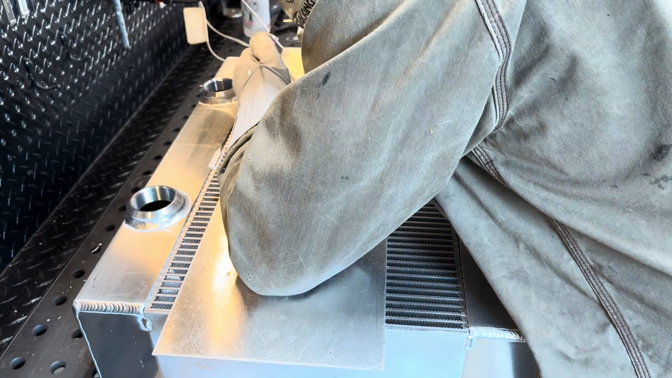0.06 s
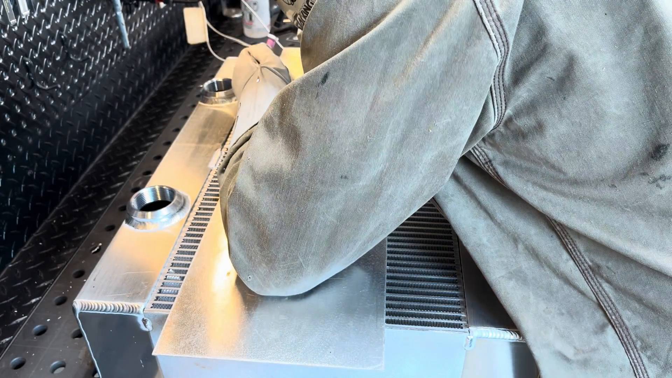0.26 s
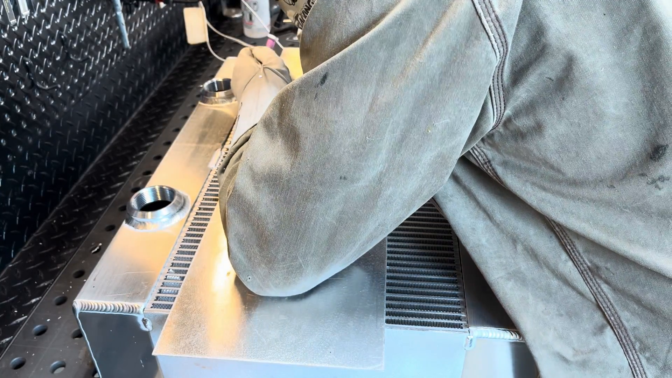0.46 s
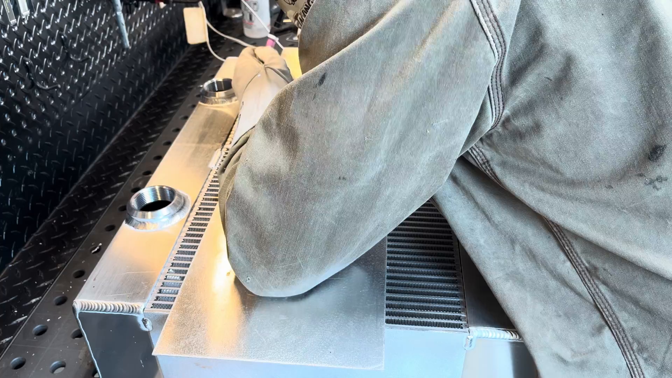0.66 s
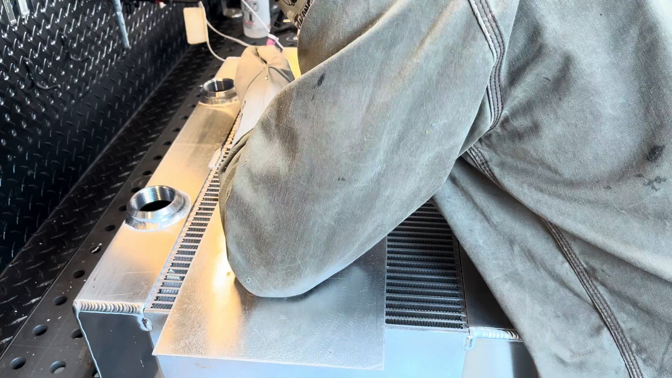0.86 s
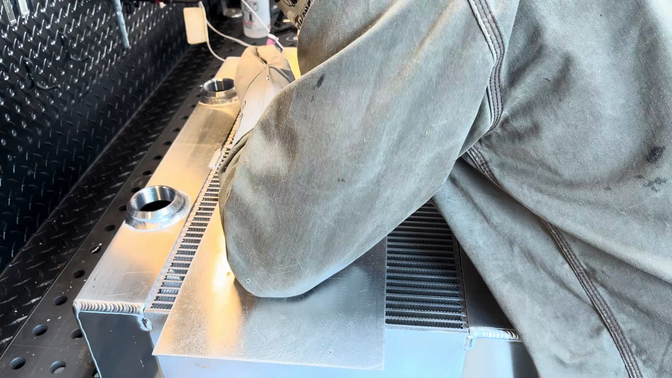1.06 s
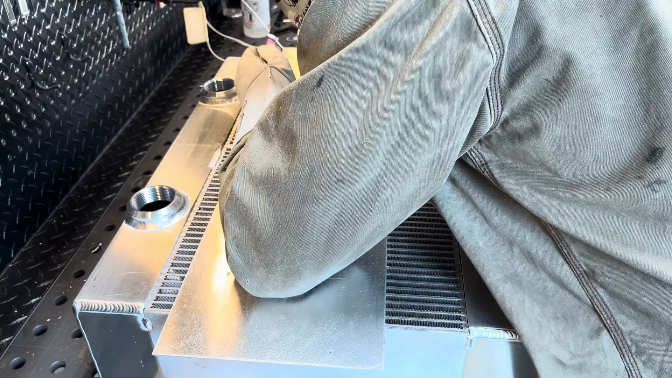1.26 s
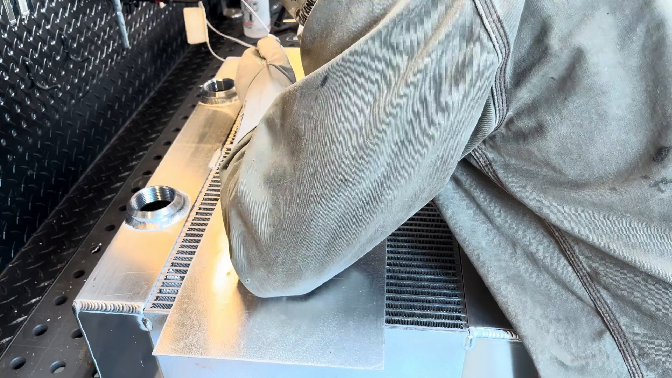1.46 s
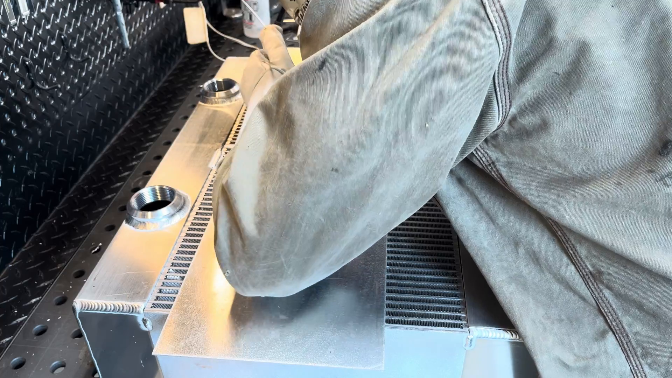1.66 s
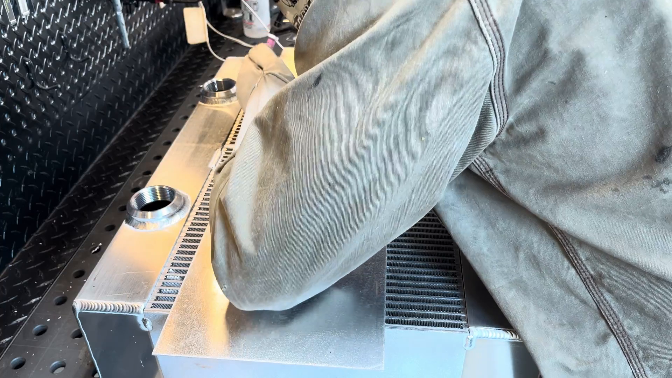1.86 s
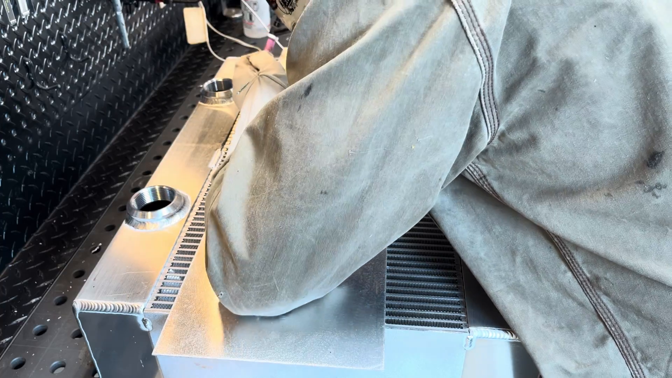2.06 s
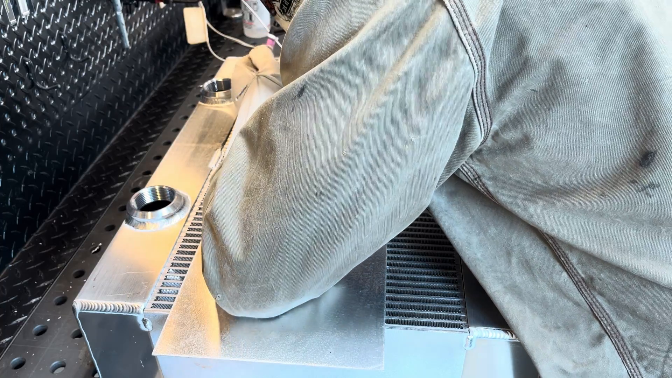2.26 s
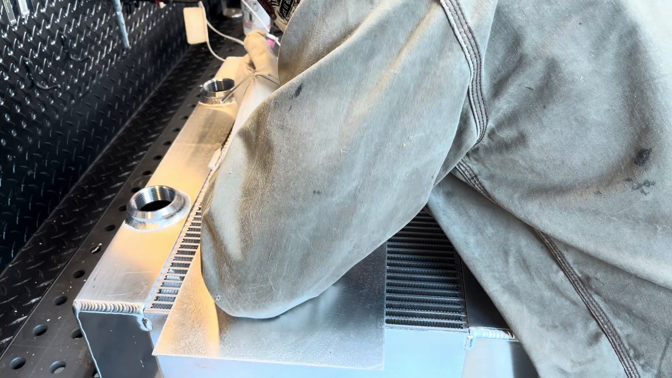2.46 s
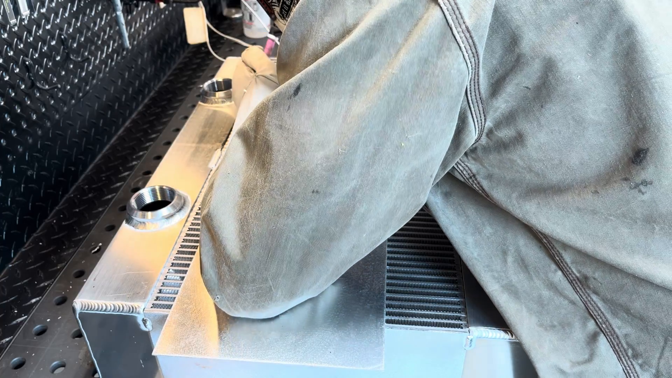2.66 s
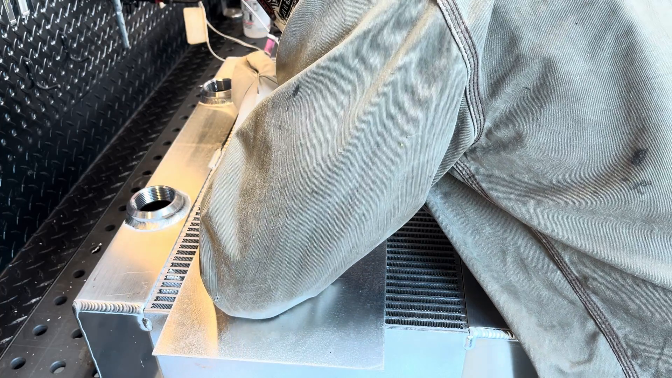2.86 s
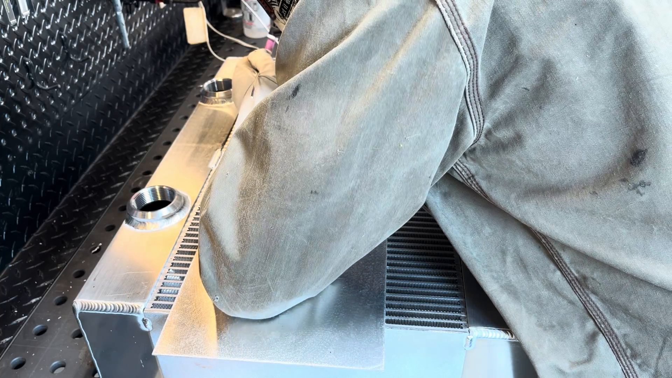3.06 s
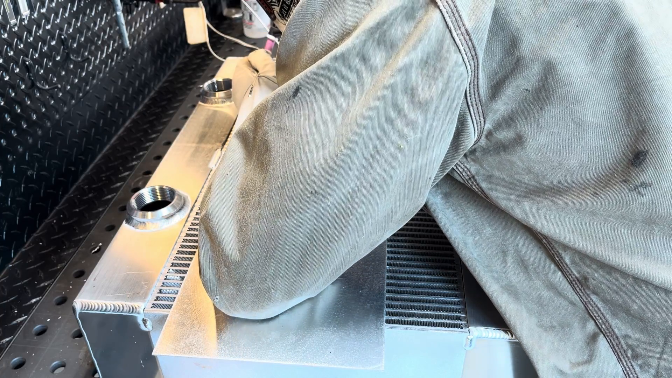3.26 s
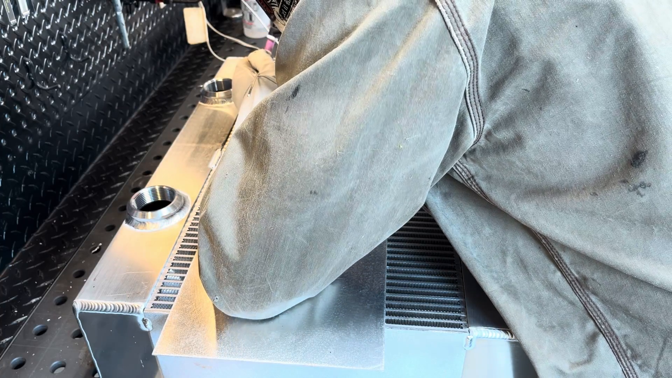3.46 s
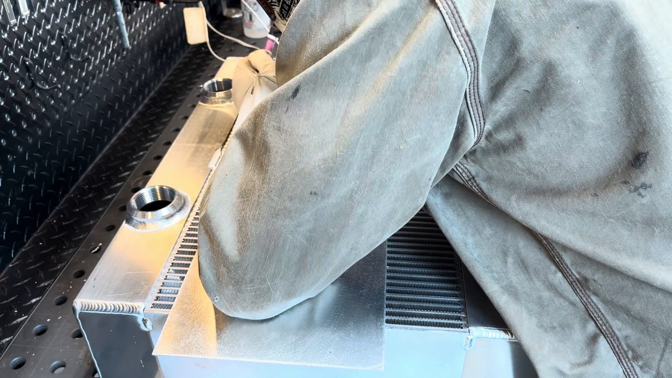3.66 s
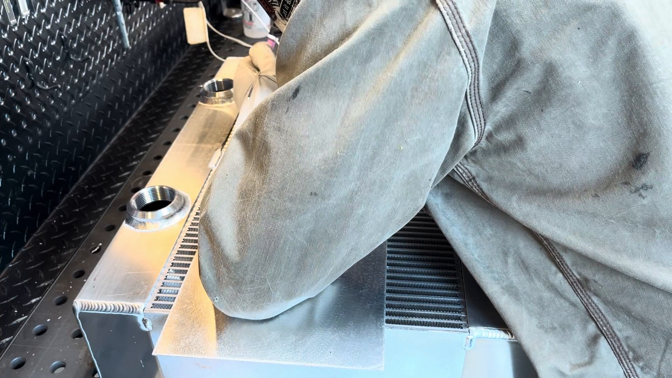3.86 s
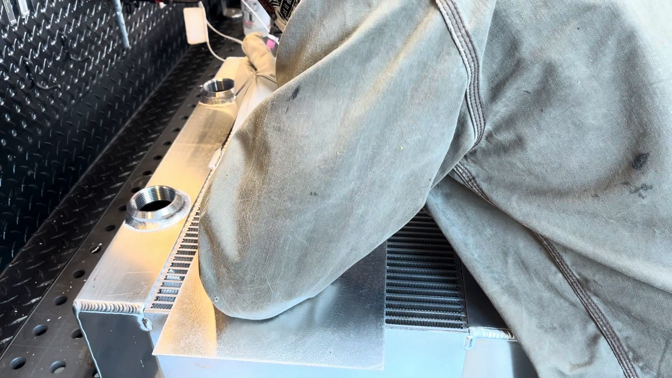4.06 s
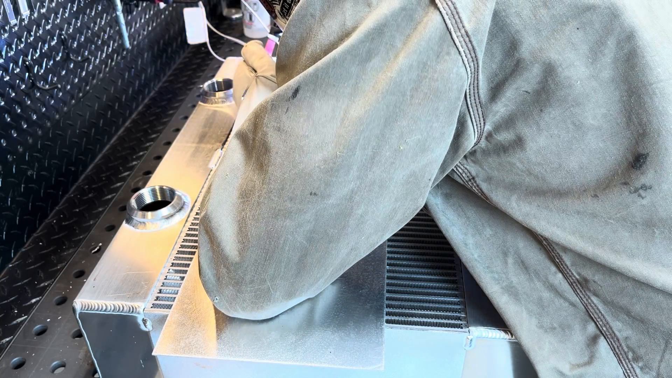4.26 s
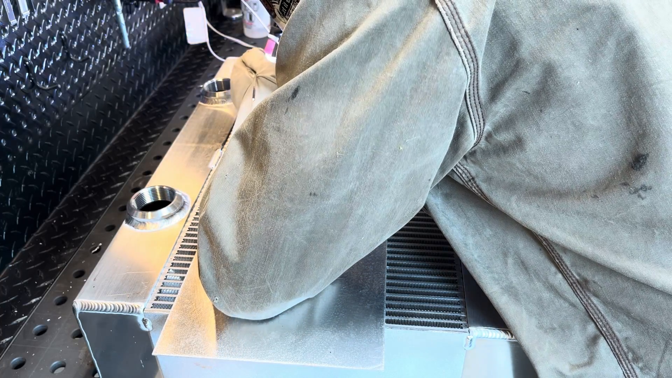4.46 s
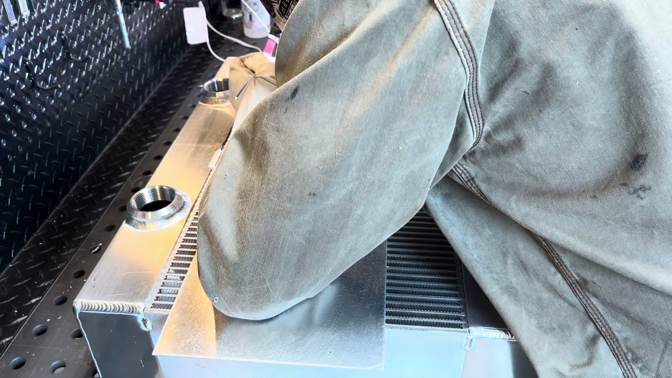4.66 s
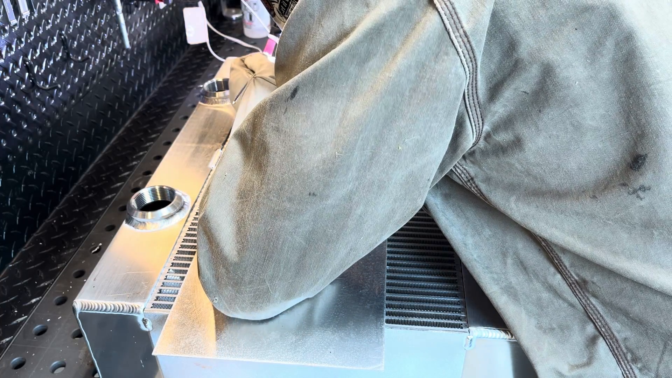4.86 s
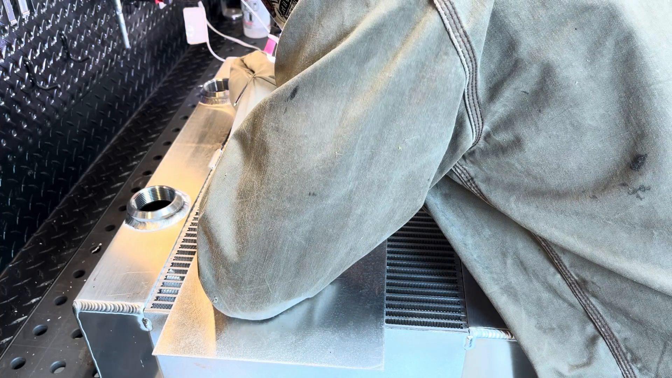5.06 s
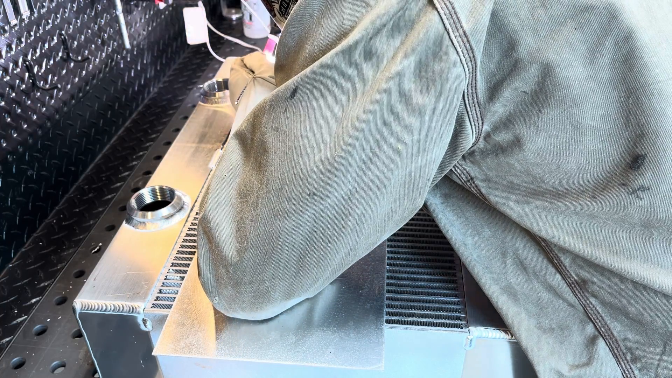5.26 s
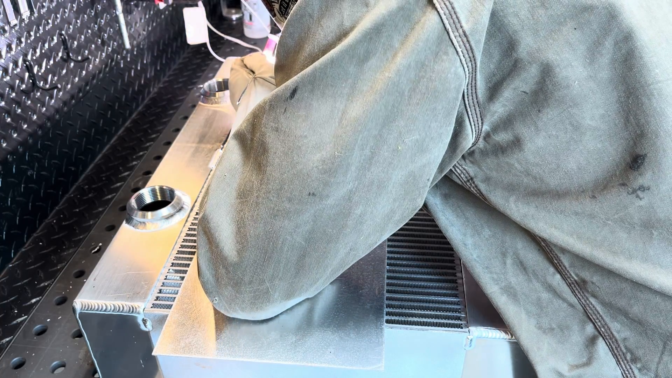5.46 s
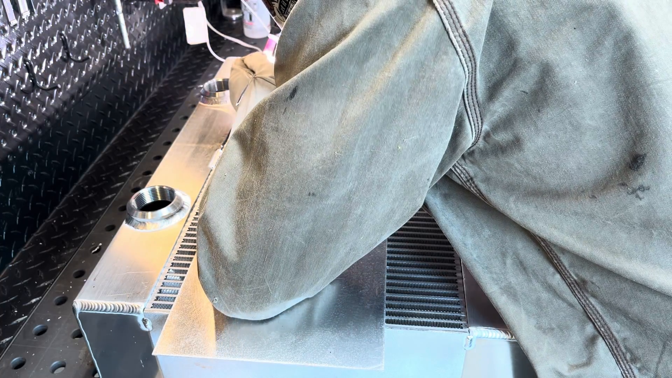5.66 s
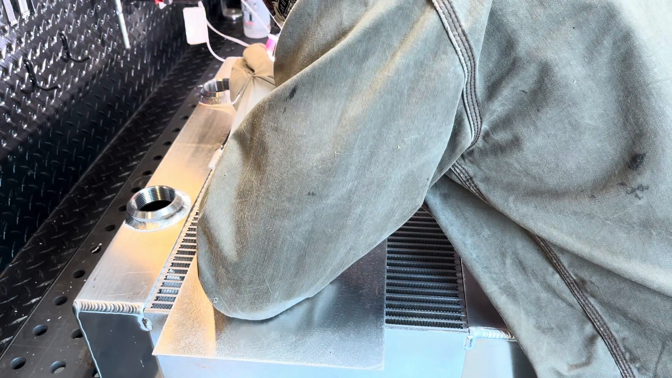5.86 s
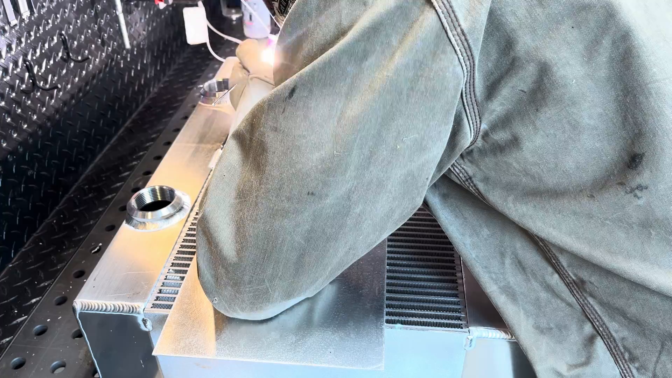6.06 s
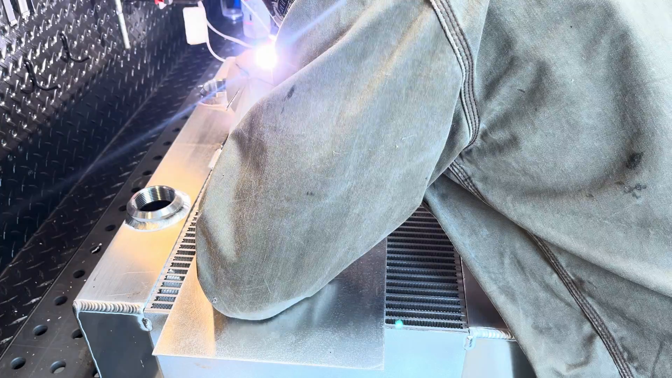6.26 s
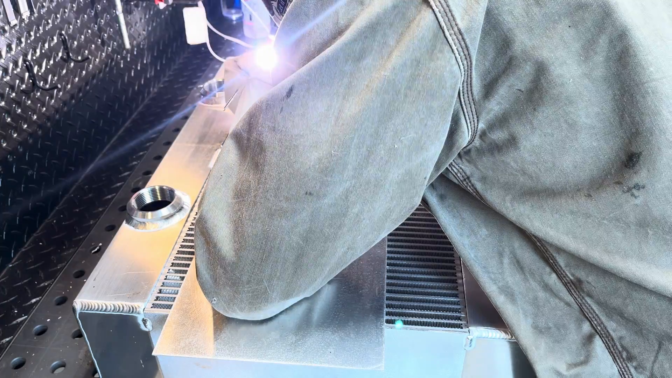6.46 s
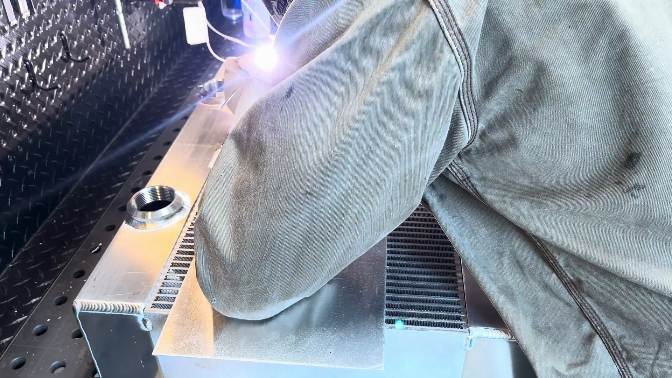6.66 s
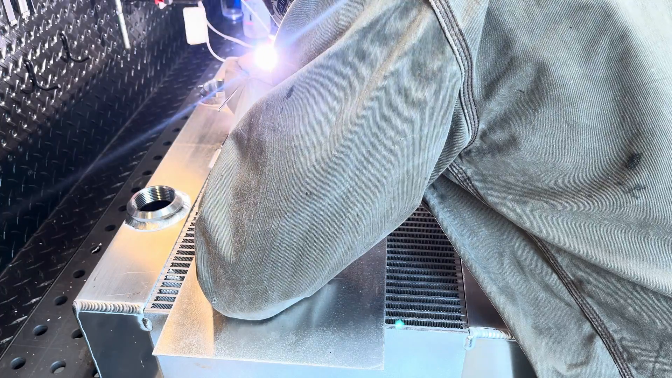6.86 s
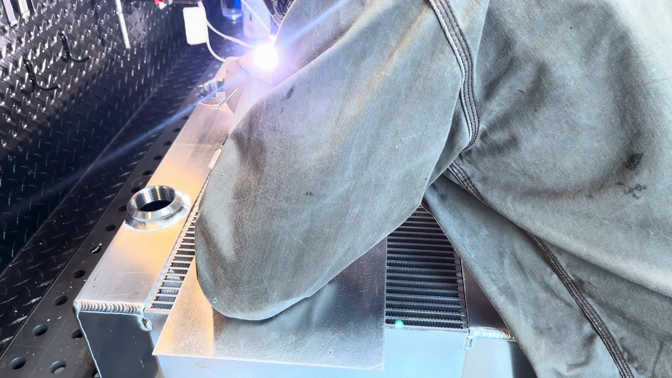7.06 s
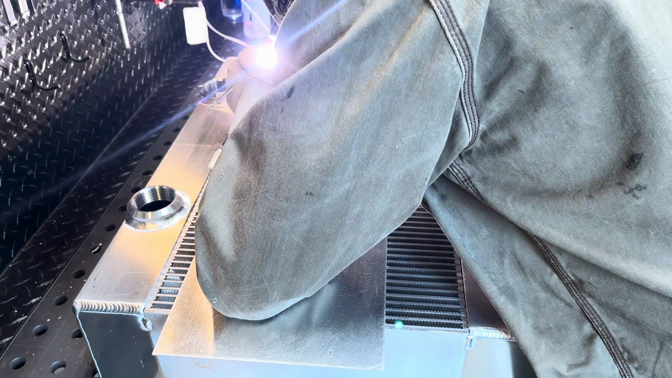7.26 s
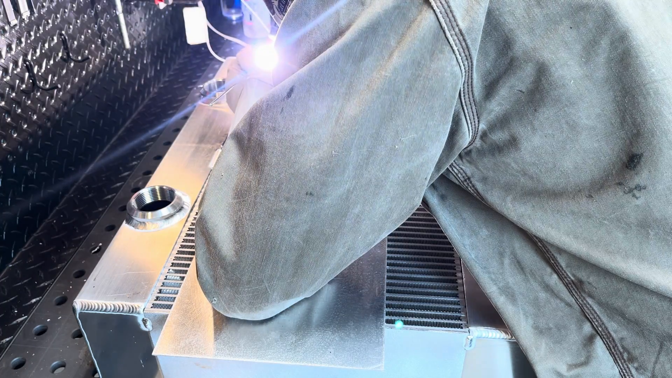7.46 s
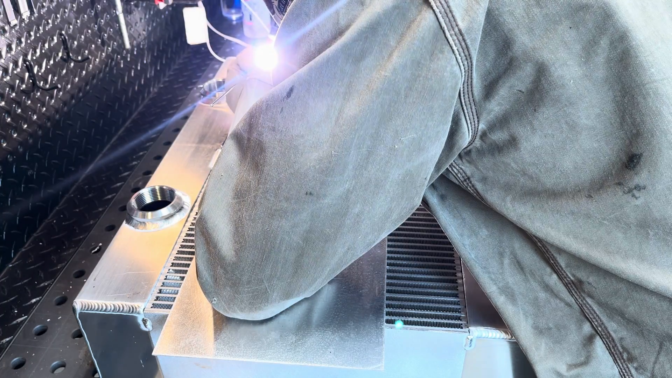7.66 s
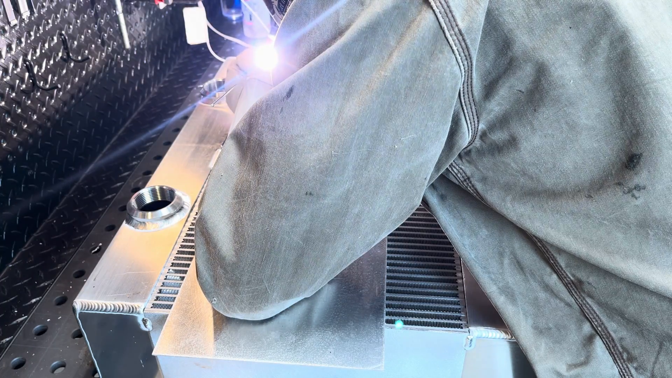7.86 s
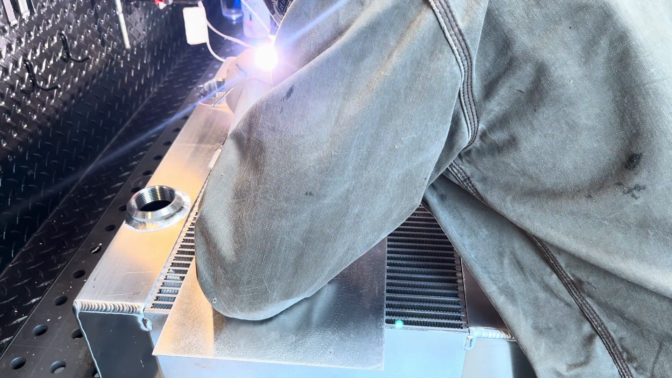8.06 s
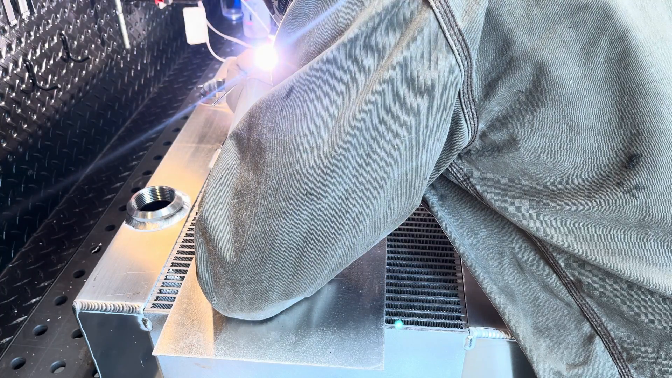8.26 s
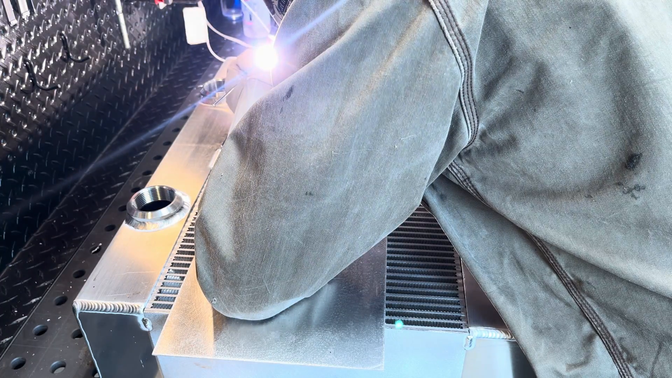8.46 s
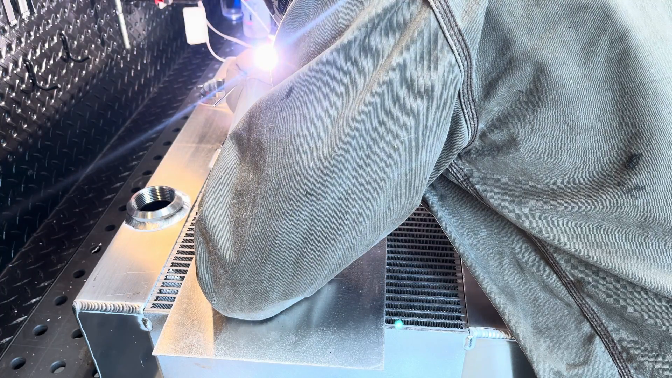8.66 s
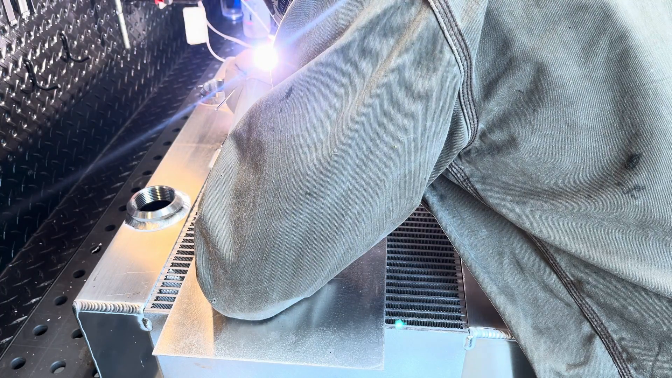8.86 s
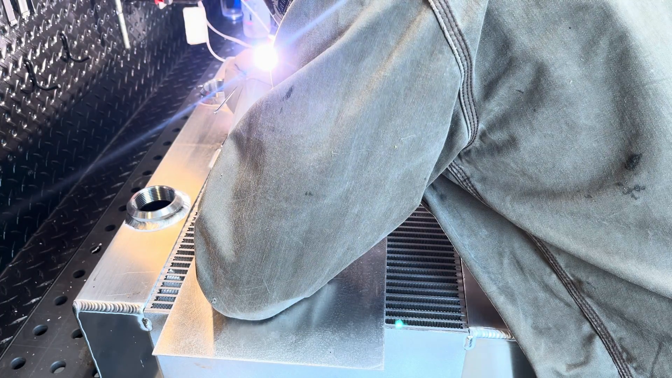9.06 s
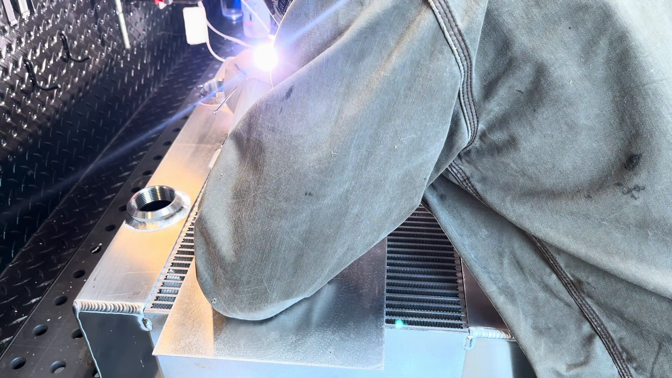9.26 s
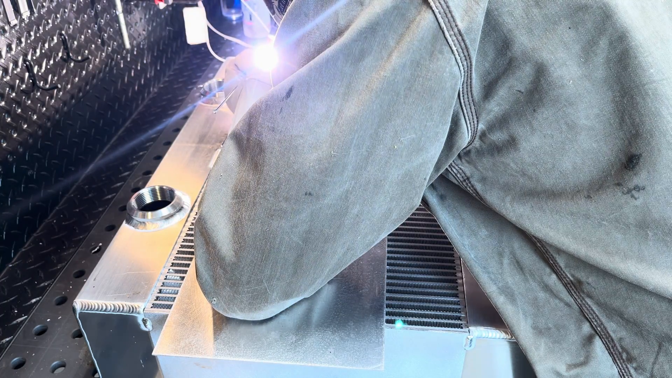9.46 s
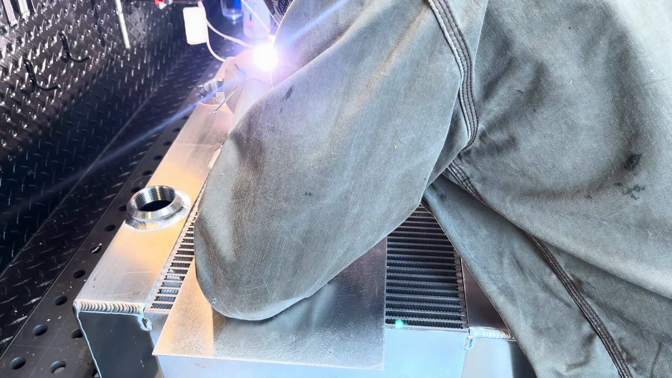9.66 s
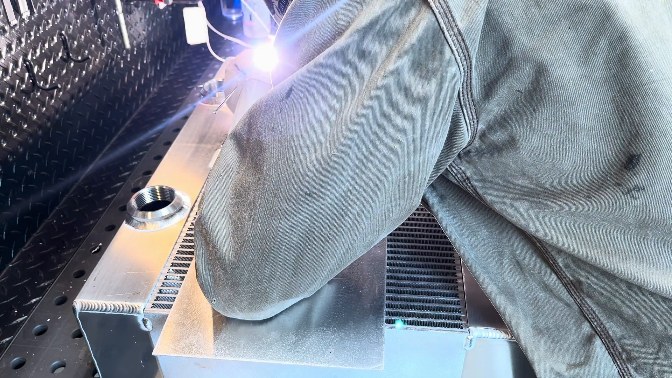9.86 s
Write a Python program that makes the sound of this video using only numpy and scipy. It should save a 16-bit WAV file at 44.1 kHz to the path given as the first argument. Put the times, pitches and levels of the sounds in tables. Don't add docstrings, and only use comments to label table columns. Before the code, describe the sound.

Quiet hum, fan and shielding gas, a tiny metal tick, then an arc strikes in sputtering snaps and buzzes piercingly to the end.

```python
import sys
import numpy as np
from scipy import signal
from scipy.fft import rfft, irfft, next_fast_len
from scipy.io import wavfile
from scipy.ndimage import uniform_filter1d, map_coordinates

SR = 44100
rng = np.random.default_rng(int(sys.argv[2]) if len(sys.argv) > 2 else 0)


def amplitude_ratio(level_db):
    exponent = np.asarray(level_db, float) / 20
    return 10 ** exponent


def wav_record(signal):
    frames = np.transpose(np.atleast_2d(signal))
    bounded = np.clip(frames, -1, 1)
    quanta = np.round(bounded * 32767).astype(np.int16)
    wavfile.write(sys.argv[1], SR, quanta)


N = 437472
T = np.arange(N) / SR

AC_HZ = 198.007
STRIKE_S, SETTLE_S = 4.043, 4.432
# time_s, first_snap_db, second_snap_db
ARC_LEVELS = [(4.435, -31.5, -55), (4.55, -28.5, -49), (4.75, -26, -34), (5.1, -27, -37), (5.33, -23, -31),
              (5.37, -23, -28.5), (5.75, -24.5, -26), (5.95, -25.5, -22.5), (6.2, -23, -21.5),
              (6.95, -21.5, -19.5), (7.25, -22, -20.5), (8.15, -23.5, -19.3), (8.75, -23, -18.5),
              (9.92, -23.5, -17.5)]


def unit(x):
    return x / np.sqrt(np.mean(x ** 2) + 1e-20)


def along(points, hz):
    f, v = np.transpose(points)
    return np.interp(np.log(hz + 1), np.log(f + 1), v)


def curves(rows, t=T):
    s, *cols = np.transpose(rows)
    return [np.interp(t, s, c) for c in cols]


def gate(start, end, rise, t=T):
    return np.clip(np.minimum(t - start, end - t) / rise + .5, 0, 1)


def wobble(rate):
    coarse = T[::32]
    knots = rng.standard_normal(int(N * rate / SR) + 4)
    return np.interp(T, coarse, map_coordinates(knots, [coarse * rate]))


def filtered(x, response):
    m = 2 * next_fast_len(N // 2 + SR // 4)
    spectrum = rfft(x, m) * response(np.fft.rfftfreq(m, 1 / SR))
    return irfft(spectrum, m)[:N]


def causal(points):
    def response(hz):
        c = irfft(np.log(amplitude_ratio(along(points, hz))))
        c[1:len(c) // 2] *= 2
        c[len(c) // 2 + 1:] = 0
        return np.exp(rfft(c))
    return response


def peaks(modes, hz, base_db):
    power = sum(amplitude_ratio(2 * db) / (1 + (2 * (hz - c) / w) ** 2) for c, w, db in modes)
    return np.sqrt(amplitude_ratio(2 * base_db) + power)


def hiss(response):
    return unit(filtered(rng.standard_normal(N), response))


def pulses(times, sizes):
    at = times[:, None] * SR
    index = np.floor(at).astype(int) + np.arange(-7, 9)
    taps = np.sinc(index - at) * np.cos(np.pi * (index - at) / 16) ** 2
    return np.bincount(index.ravel(), (taps * sizes[:, None]).ravel(), N + SR)[:N]


def arc():
    # pitch_hz, level_db
    thinner = [(1100, 3), (1500, 2), (2500, 0.5), (3400, -4), (4800, 6.5), (7000, 1), (9000, 4.5),
               (14000, -5.5)]
    # pitch_hz, level_db
    stray_colour = [(1000, 0), (3400, -1.5), (5500, -2.5), (7500, 0.5), (12000, -1), (15700, 4)]
    early, late = reversals()
    s, snap_db, thud_db = strays()
    stray = pulses(s, amplitude_ratio(snap_db - 16.5))
    steady_db_gain = burning()
    beat = filtered(early, lambda hz: amplitude_ratio(along(thinner, hz))) + late
    cold = filtered(stray, lambda hz: amplitude_ratio(along(stray_colour, hz)) * np.exp(-1.1j))
    thuds = filtered(pulses(s - .0004, amplitude_ratio(thud_db + 21.5)), body)
    noise = fizz(early + late + stray, pulses(s, amplitude_ratio(snap_db)), steady_db_gain) + roar(steady_db_gain)
    return snaps(beat), snaps(cold) + thuds + noise


def reversals():
    # start_s, length_s
    flutters = [
        (5.624, .014),
        (7.215, .014),
    ]
    first_share, gap_share = .0673, .2962
    sputter_db, calm_db, ragged_db = -32.5, 0.68, 5.5
    slip_s, flutter_share = 1e-5, .4
    first = (np.arange(round(STRIKE_S * AC_HZ), int(N / SR * AC_HZ)) + first_share) / AC_HZ
    first_db, second_db = curves(ARC_LEVELS, first)
    sputter = first < SETTLE_S
    first_db = np.where(sputter, sputter_db, first_db)
    flutter = sum(gate(s, s + length, .004, first) for s, length in flutters)
    ragged = sputter + flutter_share * flutter
    first = first + slip_s * flutter * rng.choice([-2, 2], len(first))
    scatter = calm_db + (ragged_db - calm_db) * ragged
    chance = scatter[:, None] * rng.standard_normal((len(first), 4))
    early = pulses(first + 3e-6 * chance[:, 0], amplitude_ratio(first_db - 3.0 + chance[:, 1]))
    second = first + gap_share / AC_HZ
    late = pulses(second + 3e-6 * chance[:, 2], amplitude_ratio(second_db - 2.5 + chance[:, 3]))
    return early, late


def strays():
    # time_s, snap_db, thud_db
    strong = [(3.9904, -11, -15), (4.0623, -3, -31), (4.0658, -1, -19), (4.0783, -3, -19),
              (4.0455, -11, -24), (4.086, -4, -23), (4.1067, -13, -20), (4.1314, -5, -25),
              (4.1365, -6, -25), (4.1438, -9, -18), (4.1516, -1.5, -16), (4.1618, -6, -28),
              (4.1694, -11, -20), (4.1769, -6, -23), (4.187, -4, -23), (4.1971, -7, -27),
              (4.2072, -10, -22), (4.2138, -7, -27), (4.2173, -1.5, -22), (4.2425, -5, -23),
              (4.2679, -8, -25), (4.288, -3, -26), (4.3082, -1, -22), (4.3335, -7, -26), (4.3684, -10, -18),
              (4.3754, -7, -23), (4.3789, -5, -23), (4.3834, -8, -23), (4.4126, -9, -15),
              (4.4213, -12, -18)]
    chance = rng.random((40, 3))
    usual = [STRIKE_S, -17, -27]
    small = usual + chance * [SETTLE_S - STRIKE_S, 0, 0] + (chance - .5) * [0, -1, -2]
    return np.vstack([strong, small]).T


def snaps(strikes):
    # pitch_hz, level_db
    snap_colour = [(700, -31), (1300, -23.9), (2000, -8.5), (2700, -11), (3400, 2.5), (4300, -13),
                   (5200, -10.5), (6500, -1.35), (8000, -9), (9300, -19), (10800, -15), (12300, -15),
                   (14000, -19), (15700, -41)]
    colour = causal(snap_colour)
    harmonics = colour(np.arange(1, 80) * AC_HZ)
    one_cycle = np.sqrt(np.mean(abs(harmonics) ** 2) * AC_HZ / SR)

    def response(hz):
        no_lows = hz ** 6 / (hz ** 6 + 1000 ** 6)
        return colour(hz) * nearby(hz) * no_lows
    return filtered(-strikes, response) / one_cycle


def nearby(hz):
    # delay_ms, gain (minus flips the wave)
    reflections = [(0, 0.97), (0.487, -0.25), (0.747, 0.38), (1.304, 0.9), (1.314, -1.19), (1.472, 0.3),
                   (1.68, 0.24), (1.79, -0.21), (2.176, 0.17), (2.275, 0.26), (2.386, 0.19),
                   (2.591, -0.091), (2.709, -0.053), (2.847, -0.37), (3.007, -0.16), (3.337, 0.067),
                   (3.45, 0.19), (3.954, -0.45), (4.71, -0.32), (4.918, -0.18)]
    return sum(gain * np.exp(-2j * np.pi * hz * ms / 1000) for ms, gain in reflections)


def burning():
    return amplitude_ratio(-12.5) * np.hypot(*amplitude_ratio(curves(ARC_LEVELS))) * gate(SETTLE_S, 99, .006)


def fizz(clicks, stray_clicks, steady_level):
    # pitch_hz, level_db per Hz
    fizz_colour = [(100, -20), (300, -12), (1000, -21), (1700, -14.5), (2600, -10.5), (3400, -3.5),
                   (4500, -4), (5400, -1), (6700, 1), (8000, -1), (9000, -6), (11000, -6), (13000, -13),
                   (15700, -15)]
    sputter_db, flare_db, glow_s = -31.5, -0.5, 0.018
    flare = signal.lfilter([1], [1, -np.exp(-1 / (.001 * SR))], abs(clicks))
    average = uniform_filter1d(flare, size=900) + 1e-9
    glow = signal.lfilter([1], [1, -np.exp(-1 / (glow_s * SR))], abs(stray_clicks))
    sputter = gate(STRIKE_S, SETTLE_S, 0.0067)
    level = steady_level + sputter * amplitude_ratio(sputter_db) * (1 + amplitude_ratio(flare_db) * glow / 2)
    pulsing = 0.82 + 0.1 * flare / average
    noise = hiss(lambda hz: amplitude_ratio(along(fizz_colour, hz)) * (3.1 + nearby(hz)))
    return level * amplitude_ratio(0.84 * wobble(7)) * pulsing * noise


def roar(steady_level):
    sputter_db, under_fizz_db = -34, -22
    level = gate(STRIKE_S + 0.0084, SETTLE_S, .016) * amplitude_ratio(sputter_db) + amplitude_ratio(under_fizz_db) * steady_level
    return level * amplitude_ratio(2.0 * wobble(60)) * hiss(body)


def body(hz):
    # pitch_hz, width_hz, level_db
    thud_modes = [(213, 125, 7), (524, 510, 2.5), (900, 1100, 4.5), (2000, 840, -9)]
    modes = sum(amplitude_ratio(db) * 1j * hz * w / (c * c - hz * hz + 1j * hz * w) for c, w, db in thud_modes)
    soft = 1 / (1 + 1j * hz / 2500) ** 2
    notch = (325 ** 2 - hz ** 2 + 10j * hz) / (325 ** 2 - hz ** 2 + 140j * hz)
    no_rumble = (1j * hz / (80 + 1j * hz)) ** 2
    return modes * soft * notch * no_rumble


def swell():
    # start_s, breathing_db, tilt_db per multiple
    stages = [
        (4.05, -50, -1),
        (4.435, -46.5, -1),
        (4.52, -44.5, 0.5),
        (5.36, -44, 2.5),
        (5.81, -54.5, -0.5),
        (6.2, -52.5, -1),
        (7.03, -50.5, 2.5),
        (7.45, -53.5, -.5),
        (8.25, -55, -1),
    ]
    # multiple of AC_HZ, level_db
    breath = [(1, 1.5), (2, 4), (3, 2.5), (4, 0.5), (5, -4.5)]
    settling_db, settling_s, move_s = 6, .2, .03
    s, stage_db, stage_tilt = np.transpose(stages)
    stage = np.clip(np.searchsorted(s, T) - 1, 0, None)
    fresh_db = settling_db * np.exp(-abs(T - s[2]) / settling_s) * (T > s[2])
    move = round(move_s * SR)
    level_db = uniform_filter1d(stage_db[stage] + fresh_db, size=move)
    tilt_db = uniform_filter1d(stage_tilt[stage], size=move)
    total = 0
    for k, db in breath:
        tone_db = level_db + (k - 4.5) * tilt_db + db + 3.5 + .9 * wobble(9)
        total = total + amplitude_ratio(tone_db) * np.sin(2 * np.pi * (k * AC_HZ * T + rng.random()))
    return gate(STRIKE_S + 0.033, 99, .02) * total


def gas():
    # pitch_hz, level_db per Hz
    jet_colour = [(1200, -15), (2500, -0.5), (3500, 1), (6000, -2.5), (10000, 1), (14000, 0), (15700, -12)]
    # pitch_hz, width_hz, level_db
    cup_before = [(3400, 160, -3), (4030, 200, -0.5), (4740, 160, -2), (5440, 89, -12), (6250, 190, -10),
                  (6940, 220, -3.5), (7550, 110, -5), (7910, 200, -2), (8370, 140, -1.5), (9010, 120, -14),
                  (9300, 170, -7), (9770, 36, -8), (10100, 270, -6.5), (10760, 150, 0.5), (11500, 91, -6),
                  (12000, 230, -10), (12400, 68, -11), (13200, 140, -11), (13600, 46, -15),
                  (13900, 83, -12)]
    # pitch_hz, width_hz, level_db
    cup_after = [(3370, 230, -2), (4120, 130, -1.5), (5140, 74, -5), (6330, 100, -6), (7060, 350, -6.5),
                 (7750, 130, 0.5), (8240, 100, 1.5), (8740, 150, -8), (9500, 49, -6), (9700, 53, -8),
                 (10140, 130, -3.5), (11100, 120, -2), (11080, 110, -4), (12500, 170, -12),
                 (13200, 100, -9), (14000, 100, -12)]
    flow_db, surge_db, surge_s, heat_db_per_s = -53, 3, 0.36, 3
    opening = np.clip((T - .35) / 0.12, 0, 1)
    turned = np.clip((T - 1.6) / 0.66, 0, 1)
    before = hiss(lambda hz: amplitude_ratio(along(jet_colour, hz)) * peaks(cup_before, hz, base_db=-15.5))
    after = hiss(lambda hz: amplitude_ratio(along(jet_colour, hz)) * peaks(cup_after, hz, base_db=-15.5))
    jet = np.sqrt(1 - turned) * before + np.sqrt(turned) * after
    surge = surge_db * np.exp(-abs(T - .45) / surge_s)
    heating = heat_db_per_s * np.clip(T - STRIKE_S, 0, None)
    return opening * amplitude_ratio(flow_db + surge + heating + 3.5 + 0.31 * wobble(5.07)) * jet


def machine():
    # pitch_hz, level_db
    hum = [(120, 0), (360, -6), (420, -22), (480, -26)]
    # multiple of the turning speed, level_db
    pump = [(1, -27), (3, -24), (5, -20), (10, -11), (11, -14), (12, -23), (39, -28), (40, -22), (41, -19),
            (42, -20), (43, -27)]
    # pitch_hz, level_db per Hz
    fan_colour = [(20, -22), (50, -16.5), (100, -8.5), (180, -10.5), (270, -2.5), (450, -8), (800, -7.5),
                  (1400, -12), (1600, -15), (2400, -17), (3000, -22.5), (6000, -25.5), (9000, -38),
                  (15700, -51)]
    # pitch_hz, width_hz, level_db
    housing = [(363, 27, 0.5), (588, 90, -2), (1382, 71, -0.5), (2280, 120, -37)]
    pump_hz, hum_db, fan_db = 55.45, -48.5, -47
    load_db = gate(SETTLE_S, 99, .05) * (-1.5 + 0.4 * (T - SETTLE_S))

    def tone(hz, db):
        level = amplitude_ratio(db + 3.5 + 0.22 * wobble(5) * hz ** .3)
        return level * np.sin(2 * np.pi * hz * T + .2 * wobble(3.7))
    lines = sum(tone(hz, db) for hz, db in hum) + sum(tone(k * pump_hz, db) for k, db in pump)
    rush = hiss(lambda hz: amplitude_ratio(along(fan_colour, hz)) * peaks(housing, hz, base_db=-6.5))
    return amplitude_ratio(hum_db + load_db) * lines + amplitude_ratio(fan_db + 0.94 * wobble(1.3)) * rush


def tick():
    # pitch_hz, level_db, time_s to fall by 60 dB
    rod = [(3220, -1.5, 0.055), (4700, -10, .03), (6300, -10, .02), (2600, -8, .02)]
    t = np.clip(T - 1.318, 0, None)
    return sum(amplitude_ratio(-37 + db - 60 * t / t60) * np.sin(2 * np.pi * hz * t) for hz, db, t60 in rod)


def rustles():
    # time_s, level_db, pitch_hz, width_hz, length_s
    bursts = [
        (1.6, -61, 1950, 500, .08),
        (1.58, -57, 9000, 7000, .01),
        (1.32, -55, 5000, 5000, .004),
    ]
    total = 0
    for s, db, hz, width, length in bursts:
        puff = np.exp(-((T - s) / length) ** 2)
        total = total + amplitude_ratio(db) * puff * hiss(lambda f: peaks([(hz, width, 0)], f, base_db=-33))
    return total


def shop(x):
    # pitch_hz, time_s to fall by 60 dB
    room = [(200, 0.17), (2000, 0.17), (10000, 0.15)]
    hz, t, z = signal.stft(rng.standard_normal(SR // 2), SR, nperseg=256)
    fading = z * amplitude_ratio(-60 * t / along(room, hz)[:, None])
    tail = signal.istft(fading, SR, nperseg=256)[1]
    return signal.fftconvolve(np.pad(x, (160, 0)), tail / np.linalg.norm(tail))[:N]


def scene():
    buzz, rough = arc()
    duck = amplitude_ratio(-3.5 * gate(STRIKE_S, SETTLE_S, .05))
    background = duck * (gas() + machine()) + rustles() + tick()
    return (buzz + rough + amplitude_ratio(-9) * shop(rough) + swell() + background)[None]


def low_pass(x):
    return signal.sosfilt(signal.butter(12, 17010, fs=SR, output="sos"), x)


def record(dry):
    held = dry[0] / (1 + abs(dry[0]) ** 6) ** (1 / 6)
    mix = filtered(held, lambda hz: hz < 15740)[None]
    return low_pass(mix)


dry = scene()
out = record(dry)
wav_record(out)
```